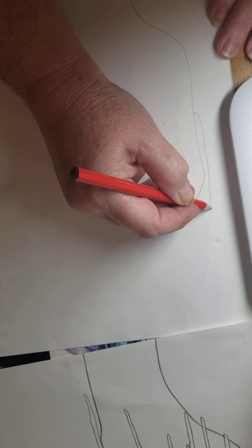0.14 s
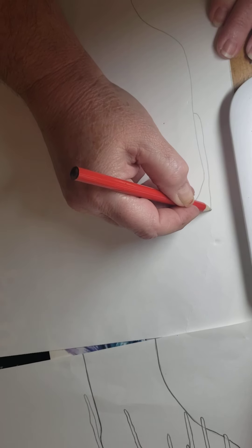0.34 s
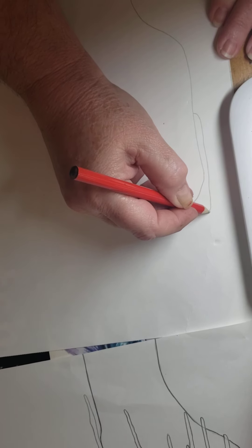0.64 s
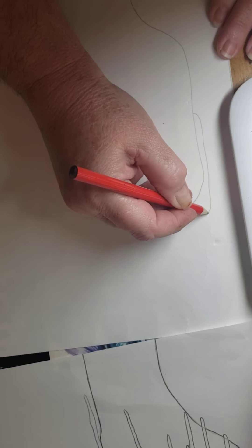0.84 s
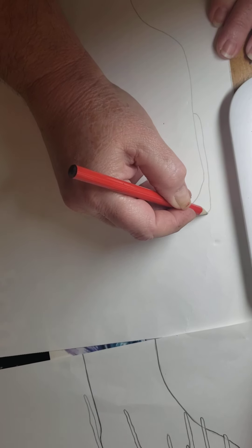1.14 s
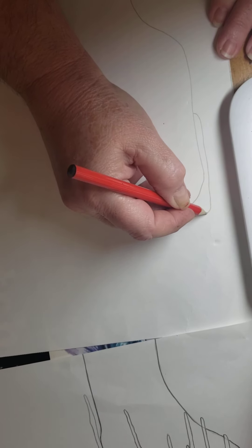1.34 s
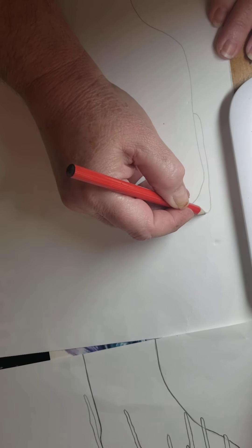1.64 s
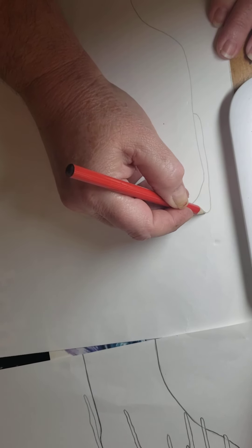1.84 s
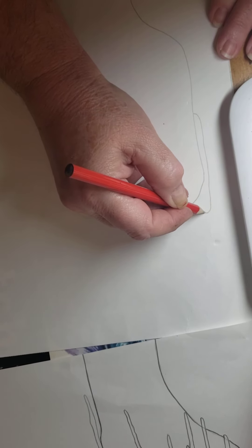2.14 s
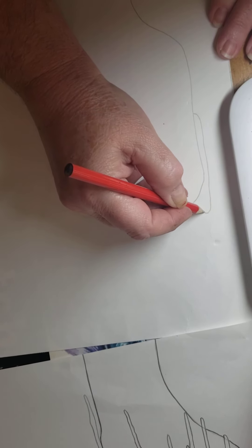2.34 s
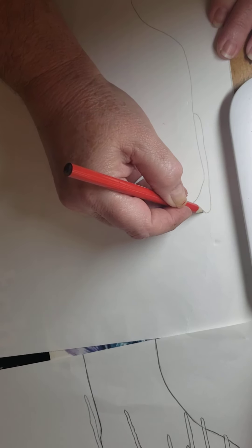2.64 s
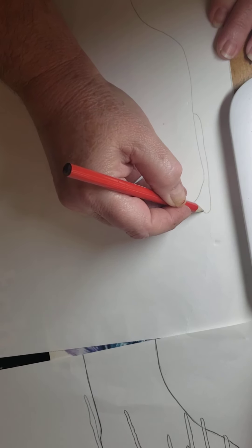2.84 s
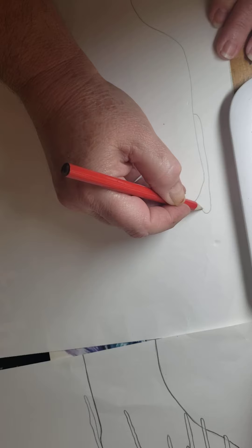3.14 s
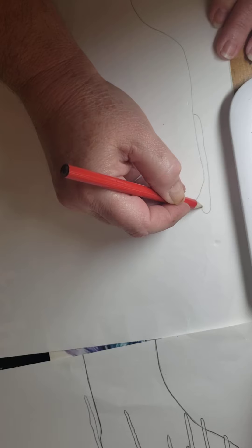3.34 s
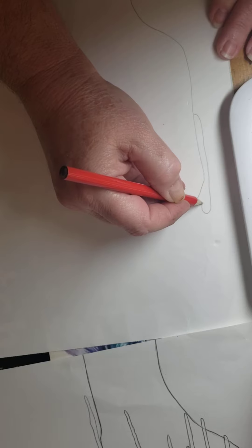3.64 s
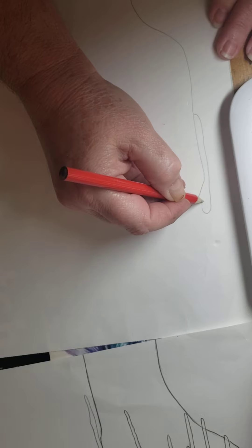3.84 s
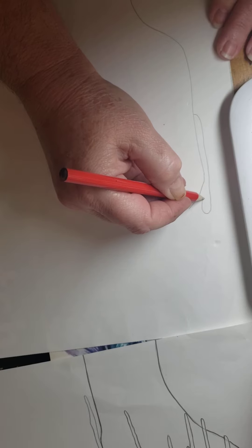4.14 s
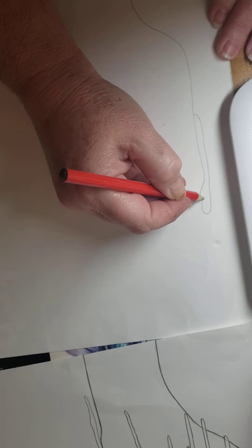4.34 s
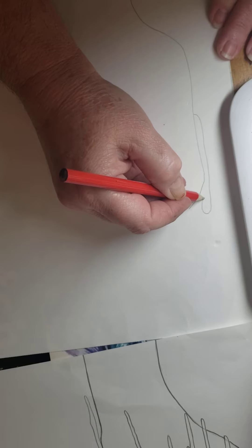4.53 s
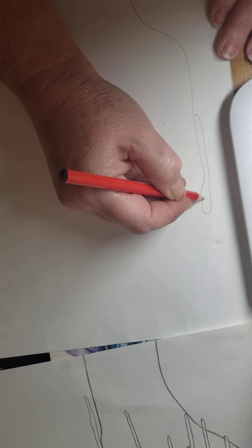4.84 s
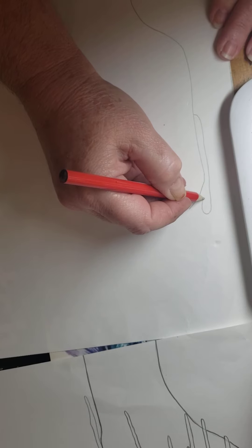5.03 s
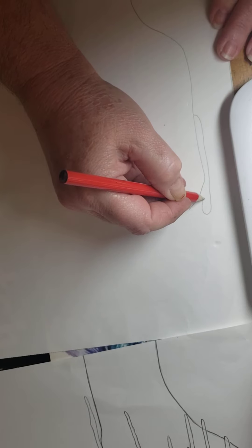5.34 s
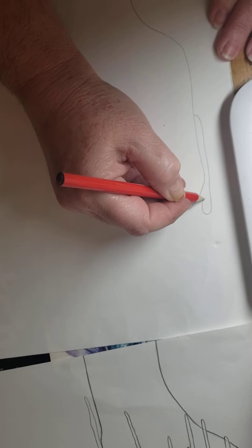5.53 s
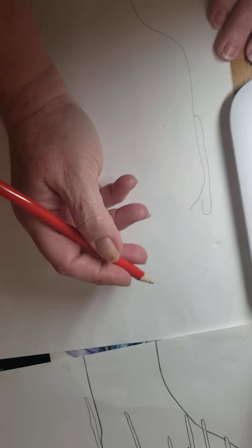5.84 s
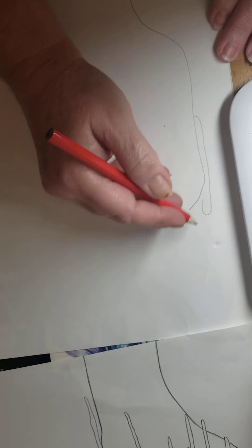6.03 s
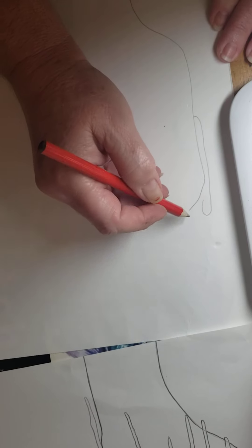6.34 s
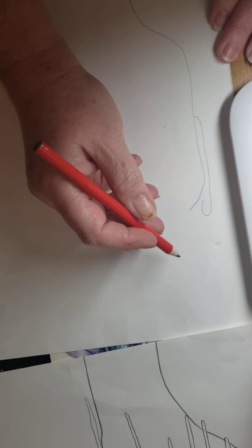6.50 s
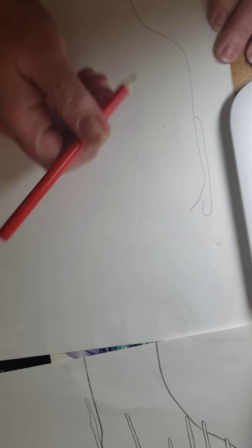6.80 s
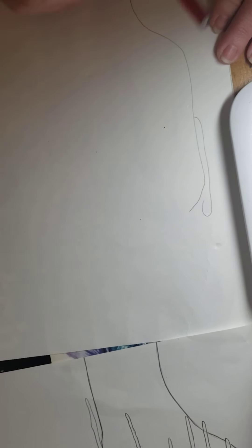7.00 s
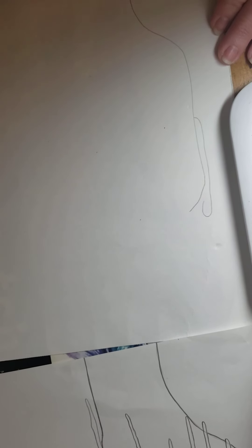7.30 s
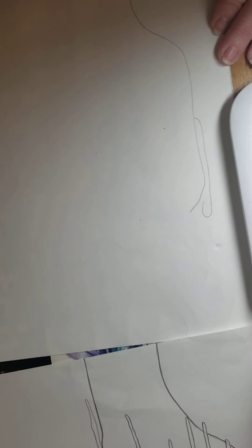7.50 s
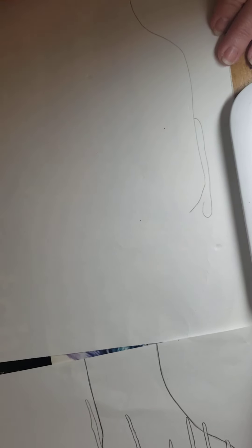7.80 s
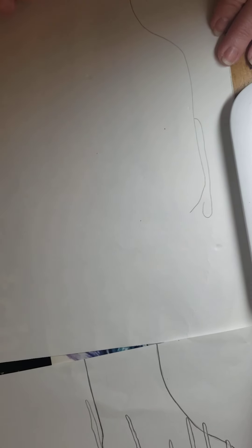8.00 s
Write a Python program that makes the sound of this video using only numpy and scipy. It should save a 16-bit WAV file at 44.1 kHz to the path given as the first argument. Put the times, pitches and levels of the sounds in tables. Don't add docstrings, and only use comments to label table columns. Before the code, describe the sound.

Close tabletop microphone, indoors. A deep steady buzz dominates, its beating slow at first and quicker later, with dull room air and occasional soft low puffs beneath. The drawing itself is not distinctly heard. Late on come two thin, bright hisses of skin on paper, the second longer and stronger. Finally a pencil-like object is put down: faint taps, then a loud dry click with a tiny bounce and short room reflection.

```python
import sys
import numpy as np
from scipy import signal
from scipy.fft import rfft, irfft, next_fast_len
from scipy.io import wavfile
from scipy.ndimage import uniform_filter1d

SR = 44100
rng = np.random.default_rng(int(sys.argv[2]) if len(sys.argv) > 2 else 0)


def rack_gain(trim_db):
    fader = np.asarray(trim_db, float)
    return 10 ** (fader / 20)


def master(y):
    cut = np.clip(np.atleast_2d(y).T, -1, 1)
    pcm = np.round(cut * 32767)
    wavfile.write(sys.argv[1], SR, pcm.astype(np.int16))


N = 359856


def evened(x):
    return x / np.sqrt(np.mean(x ** 2) + 1e-20)


def read(points, hz):
    f, value = np.transpose(points)
    return np.interp(np.log(hz + 1), np.log(f + 1), value)


def coloured(x, gain):
    size = next_fast_len(x.shape[-1])
    spectrum = rfft(x, size) * gain(np.fft.rfftfreq(size, 1 / SR))
    return irfft(spectrum, size)[..., :x.shape[-1]]


def causal(x, gain_db):
    log_gain = np.log(rack_gain(gain_db(abs(np.fft.fftfreq(2 ** 12, 1 / SR)))))
    taps = np.fft.ifft(np.exp(np.conj(signal.hilbert(log_gain)))).real
    return signal.fftconvolve(x, taps / np.linalg.norm(taps))[:len(x)]


def slow(top_hz):
    return evened(coloured(rng.standard_normal(N), lambda hz: 1 / (1 + (hz / top_hz) ** 4)))


def tone(turns, loose, top_hz=3.1):
    wander = 1 + loose * (slow(top_hz) + 1j * slow(top_hz))
    return evened((wander * np.exp(2j * np.pi * turns)).real)


# (multiple of the buzz, level [dB rms])
BUZZ_PARTIALS = [(1, -40), (2, -67.5), (4, -68)]
# (order, level [dB rms], unsteadiness [0-1])
UPPER_ORDERS = [(4, -63.5, 0.4), (5, -61.5, 0.6)]
# (time [s], lead [Hz])
MOTOR_LEAD = [(0, .1), (1.5, .33), (2.2, .6), (4.35, .67), (5.75, .76), (6.1, 1.25), (8.16, 1.1)]
# (time [s], length [s], first order [dB], second [dB], third with its casing mode [dB])
LEVEL_SHIFTS = [(0, 0.1, -12, 1, -10), (0.355, 0.3, 0, -2.5, 5), (1.05, 0.088, -3, 0.5, -2),
                (1.75, 0.25, -3, 4, -8), (2.05, 0.084, -10, -1.5, -6), (2.5, 0.17, -5, -2.5, 2.5),
                (3.25, .08, -10, -6.5, 6), (3.85, 0.16, 3.5, 5, 2), (4.3, 0.041, -8, 3, -16),
                (4.9, 0.13, 0, 0, -9), (5.3, 0.3, 0.5, 3.5, -5.5), (5.748, 0.073, -12, 3.5, 3.5),
                (6.6, 0.11, -4, 0.5, -4), (7.356, 0.081, 1.5, 2.5, -12)]


def hum():
    buzz_hz, start_lead_turns = 120.007, -.5
    casing_hz, casing_share = 168.1, 0.56
    port_lag_s = .00011
    t = np.arange(N) / SR
    lead_hz = np.interp(t, *np.transpose(MOTOR_LEAD))
    shaft = (buzz_hz * t + np.cumsum(lead_hz) / SR + start_lead_turns) / 2

    shift_db = sum(np.outer(db, np.exp(-((t - s) / length) ** 2)) for s, length, *db in LEVEL_SHIFTS)
    first_db = -51 + 4 * lead_hz + shift_db[0]
    second_db = -39 + 1.5 * lead_hz + shift_db[1]
    third_db = -43.5 - 4.5 * lead_hz + shift_db[2]

    out = sum(np.sqrt(2) * rack_gain(db) * np.cos(2 * np.pi * k * buzz_hz * t) for k, db in BUZZ_PARTIALS)
    out += rack_gain(first_db) * tone(shaft, 0.076)
    out += rack_gain(second_db) * tone(2 * shaft, 0.11)
    third = tone(3 * shaft, 0.29) + casing_share * tone(casing_hz * t, 1.1, top_hz=5.9)
    out += rack_gain(third_db) * evened(third)
    out += sum(rack_gain(db) * tone(order * shaft, loose) for order, db, loose in UPPER_ORDERS)
    return np.array([out, np.roll(out, round(port_lag_s * SR))]) * rack_gain([[.3], [-.3]])


# (time [s], level [dB], hardness [0 soft touch - 1 snap], crack length [s])
CONTACTS = [(7.5372, -25.5, 0.05, 0.002), (7.561, -30.5, 0.12, 0.0022), (7.579, -31, 0, 0.002),
            (7.596, -38, 0.18, 0.002), (7.614, -39, 0.058, 0.003), (7.64, -12, 1, 0.00093),
            (7.6405, -10, 0.97, 0.002), (7.6434, -20, 0.44, 0.0017), (7.6496, -23.5, 0.63, 0.0016),
            (7.653, -21, 0.66, 0.00078), (7.667, -21, 0.36, 0.0016)]
# (frequency [Hz], level [dB], t60 [s])
OBJECT_RINGS = [(330, -11, .07), (500, -12, .06), (790, -13, .07), (990, -15, .09), (1265, -15, .1),
                (1820, -9, .06), (2250, -13, .05), (2890, -11, .05), (3700, -13, .05), (4786, -20, .03),
                (8839, -12, .07), (12950, -6, .05), (13300, -7, .05)]
# (frequency [Hz], level [dB])
TOUCH_COLOUR = [(150, -23), (330, 1.5), (700, 3.5), (1300, 3), (1700, -2.5), (2300, -10.5), (3600, -5),
                (4300, -19), (4900, -15.5), (6000, -37.5), (9000, -27.5), (11000, -39), (15500, -37)]
# (frequency [Hz], level [dB])
SNAP_COLOUR = [(150, -27), (350, -13.5), (700, -12), (1800, 5.5), (2250, 0.5), (2900, 1.5), (3800, -4.5),
               (5000, 1.5), (6500, -3), (8300, -1), (11500, -8), (13200, 1.5), (15500, -19)]


def hits():
    t = np.arange(SR // 4) / SR
    out = np.zeros(N)
    rings = sum(rack_gain(db - 60 * t / t60) * np.sin(2 * np.pi * hz * t) for hz, db, t60 in OBJECT_RINGS)
    bins_hz = np.fft.rfftfreq(len(t), 1 / SR)
    for s, db, hard, length in CONTACTS:
        attack = np.minimum(t / .0001, 1)
        crack = rng.standard_normal(len(t)) * np.exp(-(t / length) ** 1.4) * attack
        lumps_db = 10 * np.log10(uniform_filter1d(abs(rfft(crack)) ** 2, size=100))
        crack = causal(crack, lambda hz: -np.interp(hz, bins_hz, lumps_db))
        crack *= np.sqrt(length * SR / 2) / np.linalg.norm(crack)
        sound = causal(crack + rack_gain(-15.0) * rings,
                       lambda hz: hard * read(SNAP_COLOUR, hz) + (1 - hard) * read(TOUCH_COLOUR, hz))
        at = round(s * SR)
        out[at:at + len(t)] += rack_gain(db) * sound[:N - at]
    return out


# (frequency [Hz], level [dB])
TABLE_LEFT = [(350, -3), (850, 14), (1500, -0.5), (2200, 6), (3300, 6), (4700, 16.5), (7500, 18.5),
              (9000, 6), (13000, 8), (16000, -3)]


def direct(blow):
    port_lag_s = .0003
    left = causal(blow, lambda hz: .5 * read(TABLE_LEFT, hz))
    right = causal(blow, lambda hz: -.5 * read(TABLE_LEFT, hz))
    return np.array([left, np.roll(right, round(port_lag_s * SR))]) * rack_gain([[2], [-2]])


# (frequency [Hz], t60 [s])
ROOM_DECAY = [(300, 0.36), (800, 0.16), (2100, 0.21), (5500, 0.21), (12000, 0.16)]


def room(blow):
    first_wall_s = 0.0029
    hz, t, z = signal.stft(rng.standard_normal((2, SR // 2)), SR, nperseg=128)
    decay = rack_gain(-60 * t / read(ROOM_DECAY, hz)[:, None])
    tail = signal.istft(z * decay, SR, nperseg=128)[1]
    tail *= np.clip(np.arange(tail.shape[1]) / (first_wall_s * SR) - .5, 0, 1)
    tail /= np.linalg.norm(tail[0])
    return rack_gain([[-2], [-4.5]]) * signal.fftconvolve(blow[None], tail, axes=1)[:, :N]


# (fastest moment [s], level [dB], rise [s], fall [s], top [1 pointed - 3 flat])
STROKES = [
    (6.045, -64, .14, .13, 1.4),
    (6.77, -57.5, .225, .135, 2.3),
]
# (frequency [Hz], level [dB])
SKIN_COLOUR = [(2000, -23), (4000, -10), (6000, -18), (8000, -9.5), (10500, -5), (12000, -1), (14000, -1.5),
               (16000, 0.5)]
# (frequency [Hz], level [dB])
PORT_LEFT = [(100, 2), (300, -2), (720, 5), (1250, 2), (2250, 8), (2700, 7.5), (3600, 6.5), (4050, 10.5),
             (4300, 6), (4750, 8.5), (5000, 11.5), (7600, 16), (8200, 1.5), (12000, -2)]


def slides():
    slide_db = 20
    t = np.arange(N) / SR
    level = 0
    for s, db, rise, fall, top in STROKES:
        distance = abs((t - s) / np.where(t < s, rise, fall))
        level = level + rack_gain(db - slide_db * distance ** top)
    grit_db = 3 * np.minimum(rng.exponential(1, N), 5) + 1.2 * slow(top_hz=40)
    slips = rng.standard_normal((2, N)) * rack_gain(grit_db)
    hiss = evened(coloured(slips, lambda hz: rack_gain(read(SKIN_COLOUR, hz))))
    return rack_gain(7) * level * coloured(hiss, lambda hz: rack_gain(np.outer([.5, -.5], read(PORT_LEFT, hz))))


# (time [s], level [dB], length [s])
DRAUGHT_PUFFS = [(0.01, -48, 0.047), (.27, -56, 0.075), (1.3, -56, 0.23), (2.003, -54, 0.045),
                 (2.167, -49, 0.059), (4.744, -45, 0.034), (4.88, -51, 0.12), (5.082, -51, 0.031),
                 (5.82, -53, 0.088), (6.0, -51, 0.079), (6.302, -69, 0.11), (7.206, -56, 0.084),
                 (7.77, -54, 0.044)]


def draughts():
    t = np.arange(N) / SR
    level = sum(rack_gain(db) * np.exp(-((t - s) / length) ** 2) for s, db, length in DRAUGHT_PUFFS)
    lumps = coloured(rng.standard_normal((2, N)), lambda hz: (hz / 45) ** 2 / (1 + (hz / 55) ** 4))
    return evened(lumps) * level * rack_gain([[4], [0]])


# (frequency [Hz], width [Hz], level [dB per Hz])
ROOM_MODES = [(56.7, 12, -68), (86.6, 18, -68), (113.8, 6.5, -56.5), (131, 18, -73.5), (170.7, 17.8, -63),
              (224.7, 17, -73.5), (245.6, 20.3, -70.5), (294.2, 6, -70.5), (320.3, 15, -70),
              (358.6, 39, -74.5), (416, 26, -78.5), (481.6, 22.7, -75.5), (537, 18, -89), (615, 120, -83),
              (684.6, 23, -82), (713.7, 22, -78.5), (824, 11, -83)]
# (frequency [Hz], level [dB per Hz])
AIR_FLOOR = [(20, -101.5), (45, -75.5), (150, -78.5), (270, -83), (900, -87), (1300, -85.5), (2000, -94),
             (2800, -99), (3200, -104), (4400, -108), (7300, -118), (9500, -116), (12000, -113),
             (16000, -115)]
# (frequency [Hz], likeness [-1..1])
PORT_LIKENESS = [(60, 0.95), (200, 1), (300, 0.78), (450, -0.012), (750, 0.23), (1000, 0.18), (1350, -0.79),
                 (1750, 0.19), (2300, 0.12), (3000, 0.081), (4200, -0.12)]


def air():
    a, b = rng.standard_normal((2, N))
    ripple = evened(uniform_filter1d(rng.standard_normal((2, 2 ** 11)), size=4))
    ripple_hz = np.linspace(0, SR / 2, 2 ** 11)

    def right_gain(hz):
        peaks = sum(rack_gain(db) ** 2 / (1 + (2 * (hz - f) / width) ** 4) for f, width, db in ROOM_MODES)
        smooth = np.sqrt((peaks + rack_gain(read(AIR_FLOOR, hz)) ** 2) * SR / 2)
        ragged = np.array([np.interp(hz, ripple_hz, r) for r in ripple])
        return smooth * rack_gain(1.7 * ragged * (hz > 500) / (1 + (hz / 5000) ** 2))

    def same(hz):
        return np.clip(read(PORT_LIKENESS, hz), -1, 1)

    left = coloured(a, same) + coloured(b, lambda hz: np.sqrt(1 - same(hz) ** 2))
    pair = np.array([coloured(left, lambda hz: rack_gain(read(PORT_LEFT, hz))), a])
    return coloured(pair, right_gain) * rack_gain(0.33 * slow(top_hz=4.5))


def scene():
    blow = hits()
    return hum() + direct(blow) + room(blow) + slides() + draughts() + air()


def roll_off(x):
    return signal.sosfilt(signal.butter(12, 16820, fs=SR, output="sos"), x)


def record(dry):
    edge_hz, pad = 15720, 2000
    padded = np.pad(dry, ((0, 0), (pad, pad)), "reflect")
    limited = coloured(padded, lambda hz: 1 / (1 + (hz / edge_hz) ** 400))[:, pad:-pad]
    mix = np.clip(limited, -1, 1)
    return roll_off(mix)


dry = scene()
out = record(dry)
master(out)
```